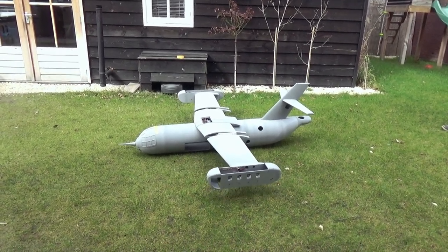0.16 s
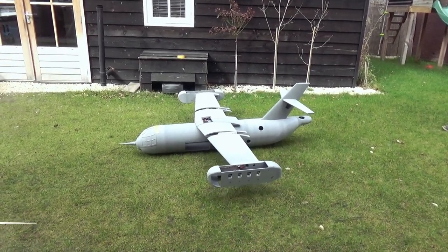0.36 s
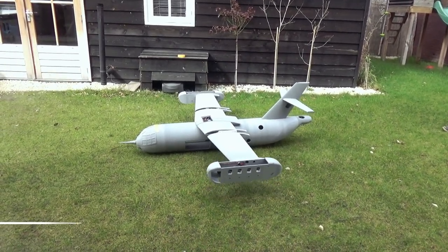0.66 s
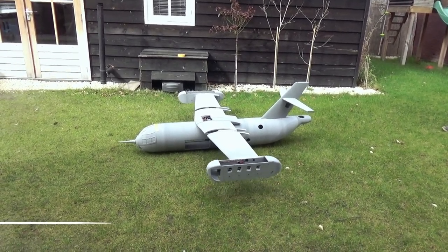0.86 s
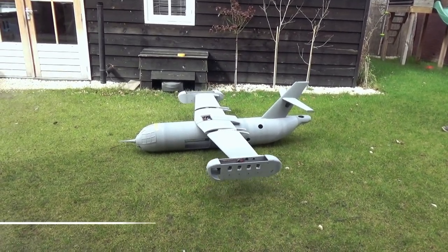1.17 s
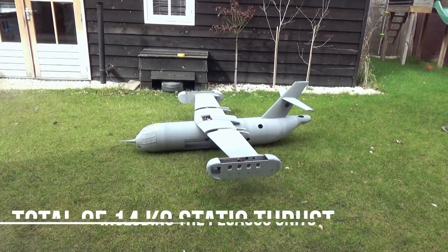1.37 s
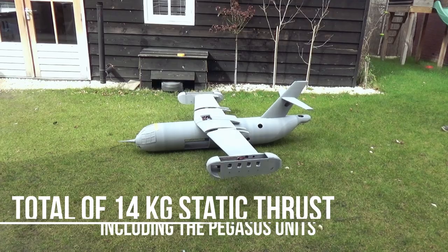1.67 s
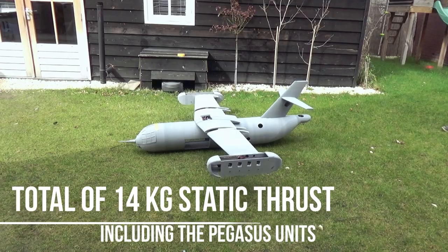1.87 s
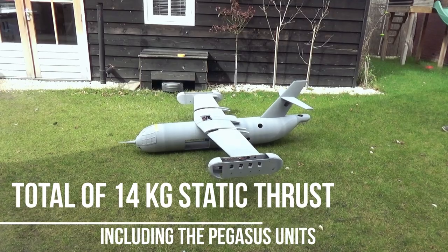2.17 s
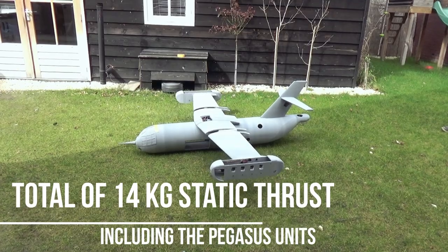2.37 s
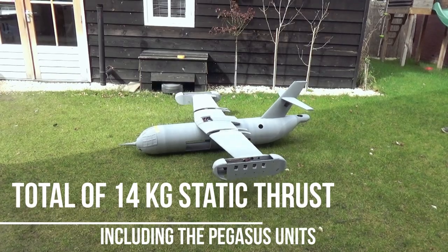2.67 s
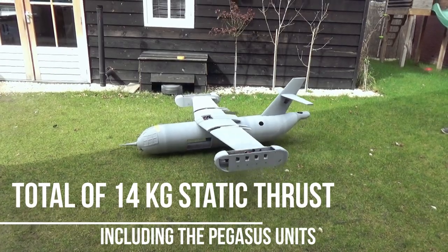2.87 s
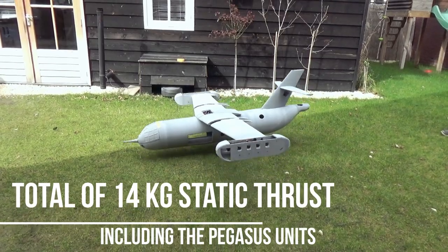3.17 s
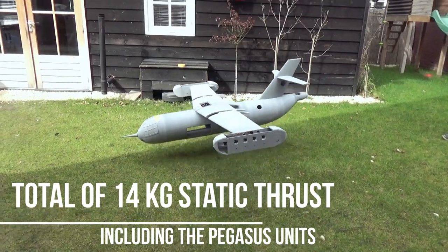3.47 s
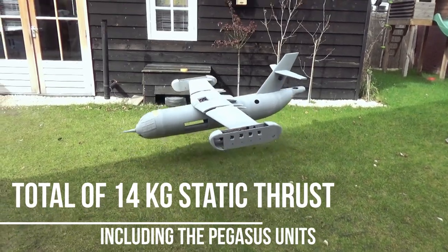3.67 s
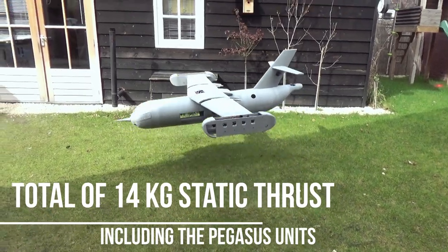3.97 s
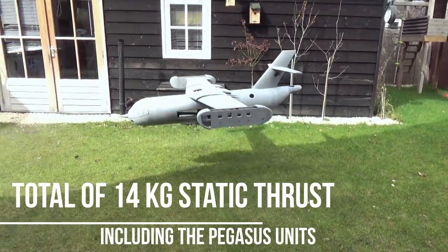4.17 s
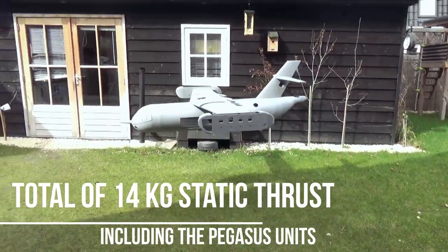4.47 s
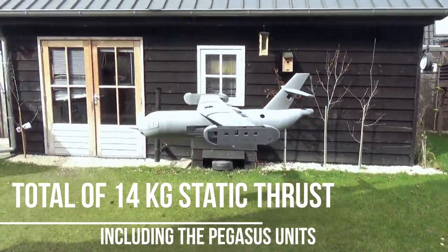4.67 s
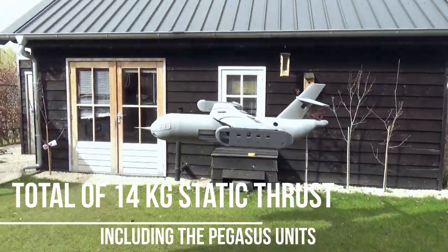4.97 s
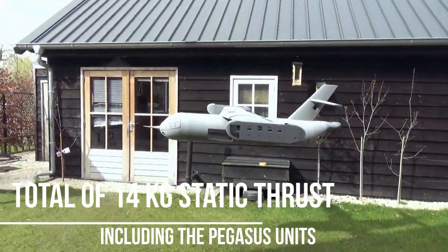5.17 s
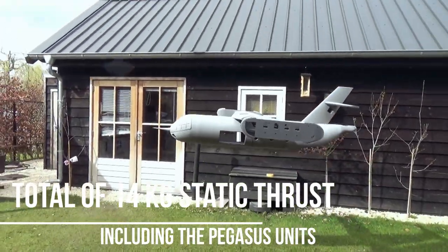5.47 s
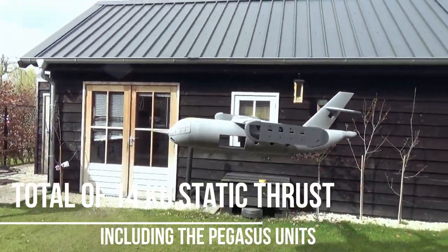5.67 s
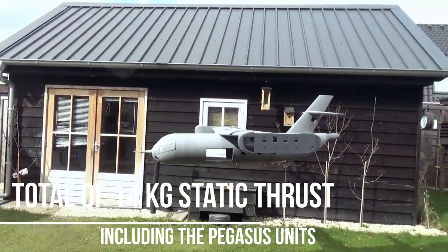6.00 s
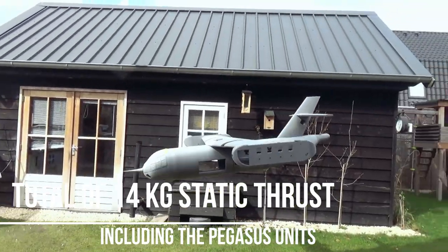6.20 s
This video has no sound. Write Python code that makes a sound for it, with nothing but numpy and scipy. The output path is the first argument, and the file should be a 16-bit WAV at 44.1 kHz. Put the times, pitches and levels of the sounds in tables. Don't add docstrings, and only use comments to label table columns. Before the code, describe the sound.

A large model jet's cluster of electric fans climbs from a lower whine to a piercing, wavering scream with dense airy hiss, close by on a lawn.

```python
import sys
import numpy as np
from scipy import signal
from scipy.fft import rfft, irfft, next_fast_len
from scipy.io import wavfile

SR = 44100
rng = np.random.default_rng(int(sys.argv[2]) if len(sys.argv) > 2 else 0)


def undo_db(level):
    steps = np.asarray(level, float) / 20
    return 10 ** steps


def dump_mix(stems):
    frames = np.atleast_2d(stems).T
    limited = np.clip(frames, -1, 1)
    pcm = np.round(limited * 32767).astype(np.int16)
    wavfile.write(sys.argv[1], SR, pcm)


N = 279594
BLADES = 12
HOVER_HZ = 800
LEFT_RIGHT = np.array([[1], [-1]])


def in_time(rows):
    s, *columns = np.transpose(rows)
    return [np.interp(np.arange(N) / SR, s, c) for c in columns]


def at_hz(points, hz):
    point_hz, db = np.array(points)[:, 0], np.array(points)[:, 1]
    return np.interp(np.log(hz + 1), np.log(point_hz), db)


def ramp(start_s, rise_s):
    return np.clip((np.arange(N) / SR - start_s) / max(rise_s, .01), 0, 1)


def octaves_from_hover(shaft_hz):
    return np.log2(shaft_hz / HOVER_HZ)


def drift(rate_hz):
    step = max(8, int(SR / rate_hz / 30))
    r = np.exp(-2 * np.pi * rate_hz * step / SR)
    coarse = rng.standard_normal(N // 8 + 402)[:N // step + 402]
    slow = signal.lfilter([1], [1, -2 * r, r * r], coarse)[400:]
    return np.interp(np.arange(N) / step, np.arange(len(slow)), slow / slow.std())


def shaft_angle(hz):
    return 2 * np.pi * (np.cumsum(hz) / SR + rng.random())


def tone(angle, rough, rough_hz):
    rough = np.clip(rough, 0, 1)
    in_step = np.sqrt(2 - 2 * rough) + np.sqrt(rough) * drift(rough_hz)
    return in_step * np.cos(angle) + np.sqrt(rough) * drift(rough_hz) * np.sin(angle)


# pitch_hz, side_minus_mid_db (before an even lift of 7.5 dB)
AIR_WIDTH = [(60, -29), (110, -33), (200, -24), (380, -38), (700, -45), (1290, -45), (2380, -61),
             (4400, -26.5), (8120, -26.5), (15000, -30)]


def air_noise(spectrum, patchy_db):
    size = next_fast_len(N)
    hz = np.fft.rfftfreq(size, 1 / SR)
    mid, side = rfft(rng.standard_normal((2, size))) * undo_db(at_hz(spectrum, hz))
    side = side * undo_db(at_hz(AIR_WIDTH, hz) + 7.5)
    pair, gust, out = np.array([mid + side, mid - side]), drift(3), 0
    top = np.log2(spectrum[-1][0])
    for centre in top - .5 - np.arange(4):
        lowest = -1 if centre > top - 3 else 0
        highest = 1 if centre < top - 1 else 0
        distance = np.clip(np.log2(hz + 1) - centre, lowest, highest)
        band = irfft(pair * np.cos(np.pi / 2 * distance) ** 2)[:, :N]
        out = out + band * undo_db(patchy_db * (.6 * gust + drift(12)))
    return out / out.std()


# pitch_hz, level_db (per Hz)
WASH_SPECTRUM = [(25, -45), (60, -16), (76, -4), (95, -12), (160, -4), (210, 3), (320, -9.5), (400, 0),
                 (520, -23), (800, -22.5)]


def downwash():
    lift_s, climb_s = 2, 2.6
    level_db = -43.5 - 8.5 * ramp(lift_s, climb_s) + .5 * LEFT_RIGHT
    return undo_db(level_db) * air_noise(WASH_SPECTRUM, patchy_db=2.0)


# pitch_hz, level_db (per Hz)
ROAR_SPECTRUM = [(100, -15.5), (250, -10), (600, 0), (1000, -1.5), (1400, -2), (2300, 0.5), (3300, -1),
                 (4500, -2), (6000, -15)]


def jet_roar():
    octaves = octaves_from_hover(in_time(WING_SPEED)[0])
    roar = undo_db(-37.5 - 0.3 * octaves) * air_noise(ROAR_SPECTRUM, patchy_db=0.76)
    fill_hz, fill_db_per_octave = (880, 1980), 3.5
    middle = signal.sosfilt(signal.butter(1, fill_hz, "band", fs=SR, output="sos"), roar)
    return roar + (undo_db(fill_db_per_octave * octaves) - 1) * middle


# pitch_hz, level_db (per Hz)
HISS_SPECTRUM = [(4000, -38), (5000, -12), (5800, -4), (6600, 2), (8500, 1.5), (11000, 1.5), (13500, -2.5),
                 (16000, -3)]


def jet_hiss():
    effort_db = in_time(WING_SPEED)[2]
    return undo_db(-23.5 + 0.13 * effort_db) * air_noise(HISS_SPECTRUM, patchy_db=1.0)


def inlet_resonance():
    inlet = sum(tone(shaft_angle(np.full(N, hz)), rough=1, rough_hz=270) for hz in (2950, 3750))
    end_s, fade_s = 0.65, .06
    return undo_db(-44) * (1 - ramp(end_s, fade_s)) * inlet


def duct_whistle():
    speed_share = in_time(WING_SPEED)[0] / HOVER_HZ
    hz = 6298 * speed_share ** 0.14
    main = tone(shaft_angle(hz + 18 * drift(20) + 10.5 * drift(3)), rough=.42, rough_hz=50)
    upper = undo_db(-8) * tone(shaft_angle(1.125 * hz), rough=1, rough_hz=90)
    start_s, rise_s = 2.6, 0.1
    return ramp(start_s, rise_s) * undo_db(-36.5 + 2.0 * drift(25)) * (main + upper)


# start_s, length_s, from_hz, towards_hz, hum_db
TRIM_MOVES = [
    (0, 0.23, 540, 553, -55),
    (1.8, 0.717, 780, 839, -43),
    (2.58, 0.56, 815, 866, -47.5),
    (4.271, 0.31, 792, 740, -38),
    (5.66, 0.34, 786, 838, -41),
    (6.1, 0.31, 722, 634.3, -41),
]


def trim_fan():
    spool_s, fade_s, sag_hz_per_s = .15, 0.13, 25
    t, group_hz = np.arange(N) / SR, in_time(WING_SPEED)[0]
    shaft_hz, gain, age_s = group_hz.copy(), np.zeros(N), np.zeros(N)
    for start_s, length_s, from_hz, to_hz, hum_db in TRIM_MOVES:
        later = t >= start_s - fade_s
        age_s[later] = t[later] - start_s
        spooling_hz = (from_hz - to_hz) * np.exp(-age_s[later] / spool_s)
        shaft_hz[later] = to_hz + spooling_hz - sag_hz_per_s * age_s[later]
        fade_in = ramp(start_s - fade_s, fade_s)
        fade_out = ramp(start_s + length_s - fade_s, fade_s)
        gain += undo_db(hum_db) * (fade_in - fade_out)
    whine_db = 1 + 52 * np.log2(shaft_hz / group_hz) - 28 * age_s
    angle = shaft_angle(shaft_hz * (1 + 0.000856 * drift(5.9)))
    hum = tone(angle, rough=0.12, rough_hz=11)
    whine = tone(BLADES * angle, rough=0.25, rough_hz=28.8)
    return gain * (hum + undo_db(whine_db) * whine)


# pitch_hz, level_db
SECOND_ORDER = [(1480, -47), (1530, -44), (1595, -51), (1612, -40.5), (1645, -43), (1670, -36)]
# pitch_hz, level_db
THIRD_ORDER = [(2230, -55), (2295, -44), (2350, -54.5), (2450, -50), (2500, -52)]


def front_pair():
    shaft_hz = in_time(SHAKY_SPEED)[0]
    second_db, third_db = at_hz(SECOND_ORDER, 2 * shaft_hz), at_hz(THIRD_ORDER, 3 * shaft_hz)
    load_s, load_rise_s = 2.45, 0.55
    out = 0
    for offset, share_db in ((-.004, -2), (.006, -5)):
        angle = shaft_angle(shaft_hz * (1 + offset + 0.002065 * drift(4)))
        second = undo_db(second_db + share_db) * tone(2 * angle, rough=.25, rough_hz=26)
        third = undo_db(third_db - 3) * tone(3 * angle, rough=1, rough_hz=55)
        out = out + ramp(load_s, load_rise_s) * (second + third)
    return out


# start_s, shaft_hz, hum_db
SHAKY_SPEED = [(0, 440, -48), (.3, 501.5, -49), (.6, 555, -44), (1, 602, -45.5), (1.48, 661.5, -31),
               (1.72, 668, -38.5), (2.05, 716.5, -37), (2.42, 718.5, -38.5), (2.62, 770, -52),
               (2.95, 809, -31.5), (3.35, 836.6, -32.5), (3.9, 810, -31), (4.25, 830, -29),
               (4.7, 782, -37.5), (5.15, 770.4, -36.5), (5.65, 768, -36), (5.9, 744.3, -31.5),
               (6.34, 787, -33)]
# peak_s, half_length_s, swell_db
SHAKY_BEATS = [(0.006, 0.041, 13), (0.594, 0.033, 5), (0.992, .05, 7), (1.474, .06, -2.5),
               (1.566, 0.038, -14), (2.161, 0.023, 5.5), (2.437, 0.056, 8.5), (2.606, 0.026, -3),
               (3.301, 0.027, -22), (3.548, 0.038, 2.5), (3.667, 0.038, 2), (4.07, 0.034, -10.5),
               (4.286, .05, 4), (4.559, 0.048, 6.5), (4.68, 0.016, -4), (4.71, 0.021, 7),
               (4.971, 0.01, -15), (4.995, .015, 8.5), (5.029, .012, 0), (5.104, .015, -17),
               (5.128, 0.014, 9.5), (5.203, 0.023, 6.5), (5.255, 0.026, -28), (5.3, .02, 9),
               (5.357, 0.014, -8), (5.578, 0.024, 8), (5.685, .018, 5), (5.779, 0.034, -10),
               (6.028, 0.054, 7), (6.253, .04, 4)]


def shaky_fan():
    shaft_hz, hum_db = in_time(SHAKY_SPEED)
    t = np.arange(0, N, 32) / SR
    swell_db = sum(db * np.exp(-((t - s) / length_s) ** 2) for s, length_s, db in SHAKY_BEATS)
    hum_db = hum_db + np.interp(np.arange(N) / SR, t, swell_db)
    hunting = .015 * (1 - .85 * ramp(2.5, .5)) * drift(8)
    return undo_db(hum_db) * tone(shaft_angle((.99 + hunting) * shaft_hz), rough=.27, rough_hz=20)


# pitch_hz, level_db
DUCT_RESPONSE = [(11800, -31), (12200, -23.5), (13200, -25), (14300, -31.5), (15700, -28), (16400, -25),
                 (17000, -60)]


def blade_octave():
    shaft_hz, spread, _ = in_time(WING_SPEED)
    level_db = at_hz(DUCT_RESPONSE, 2 * BLADES * shaft_hz) + 1.2 * drift(8)
    ridge = 0
    for side in (-.15, .2):
        angle = shaft_angle(shaft_hz * (1 + side * spread + .008 * drift(10)))
        ridge = ridge + tone(2 * BLADES * angle, rough=1, rough_hz=430)
    return undo_db(level_db - 3) * ridge


def blade_wakes():
    shaft_hz, _, effort_db = in_time(WING_SPEED)
    level_db = -24.5 + effort_db + 6.5 * octaves_from_hover(shaft_hz)
    return undo_db(level_db) * tone(BLADES * shaft_angle(shaft_hz * .985), rough=0.85, rough_hz=740)


# start_s, mean_shaft_hz, speed_spread (0-1), effort_db
WING_SPEED = [(0, 495, 0.03, 0.5), (.24, 500, 0.03, -2), (.5, 546, .03, 0.5), (1, 597, 0.08, 1.5),
              (1.5, 650, 0.08, 1.5), (2.2, 692.3, 0.09, 1), (2.62, 777, 0.04, 1), (3.05, 784.2, 0.01, 0.5),
              (3.35, 800.6, .05, 1), (3.7, 816.6, 0.02, 1), (4.22, 813.2, 0.02, 0),
              (4.45, 775.4, 0.05, 0.5), (4.8, 809.4, 0.05, 0), (5.17, 768.5, 0.03, 0.5),
              (5.65, 766.3, .025, 0), (5.85, 752.5, 0.07, -0.5), (6.07, 749.5, 0.03, 0),
              (6.34, 775, 0, 1.5)]
FAN_PLACES = [-1.3, -.75, -.4, -.12, .15, .45, .8, 1.25]


def wing_fans():
    shaft_hz, spread, effort_db = in_time(WING_SPEED)
    hum_db = -41 + 7 * octaves_from_hover(shaft_hz)
    out = np.zeros((2, N))
    for place in FAN_PLACES:
        hunting = spread * (.75 * place + .35 * drift(4)) + .004 * drift(16)
        angle = shaft_angle(shaft_hz * (1 + hunting))
        swell = undo_db(3.0 * drift(14) - 2.5 * abs(place)) / np.sqrt(len(FAN_PLACES))
        hum = undo_db(hum_db) * np.sqrt(2) * np.sin(angle)
        whine = undo_db(-25 + effort_db) * tone(BLADES * angle, rough=.6, rough_hz=60)
        pan_db = 2.2 * np.sin(7 * place) * LEFT_RIGHT
        out += undo_db(pan_db) * swell * (hum + whine)
    return out


def scene():
    air = downwash() + jet_roar() + jet_hiss() + inlet_resonance()
    single_fans = trim_fan() + front_pair() + shaky_fan()
    return air + duct_whistle() + single_fans + blade_octave() + blade_wakes() + wing_fans()


def band_limit(x):
    return signal.sosfilt(signal.butter(12, 16870, fs=SR, output="sos"), x)


def record(dry):
    peak, cutoff_hz = .65, 15730
    rounded = peak * np.tanh(dry / peak)
    passed = np.fft.rfftfreq(N, 1 / SR) < cutoff_hz
    mix = irfft(rfft(rounded) * passed, N)
    return band_limit(mix)


dry = scene()
out = record(dry)
dump_mix(out)
```